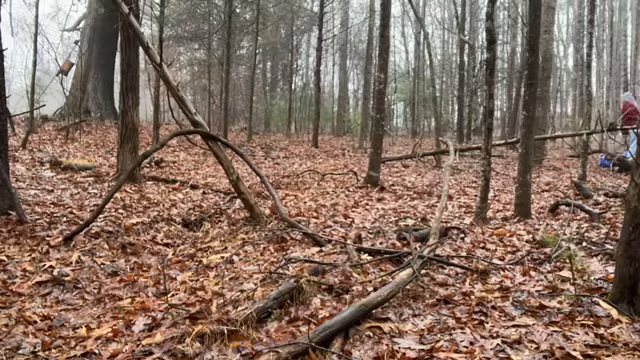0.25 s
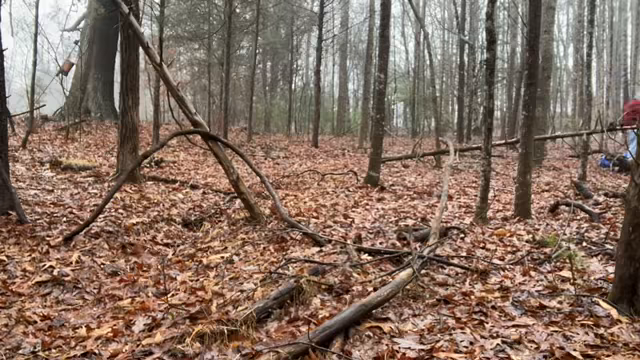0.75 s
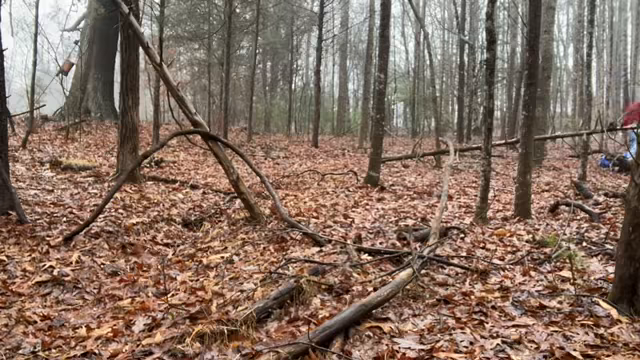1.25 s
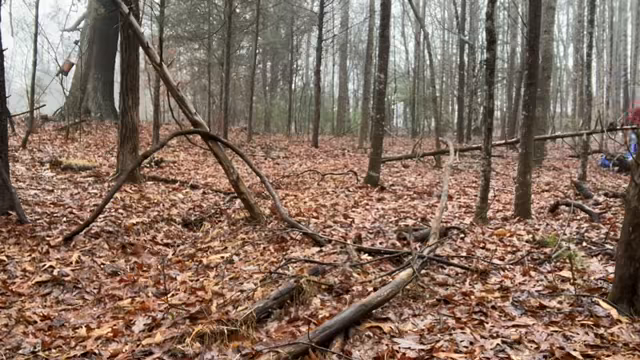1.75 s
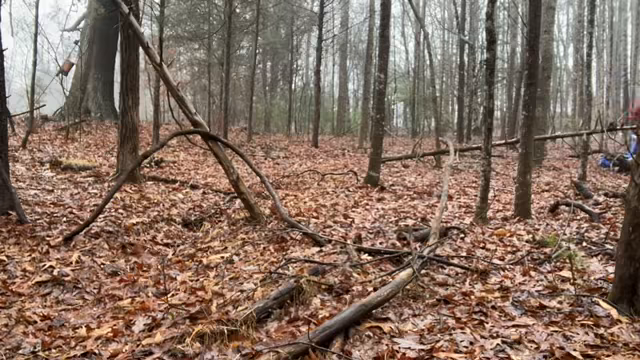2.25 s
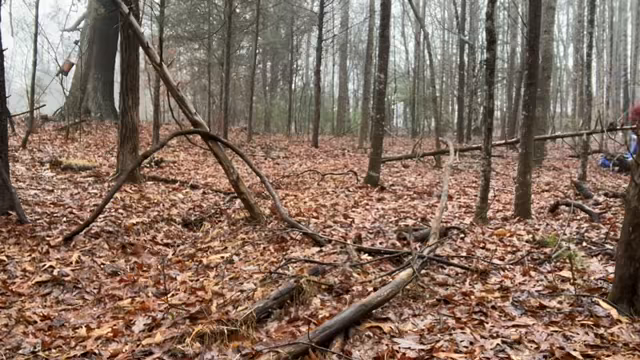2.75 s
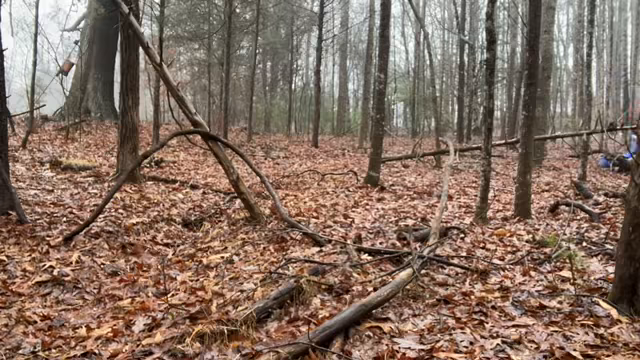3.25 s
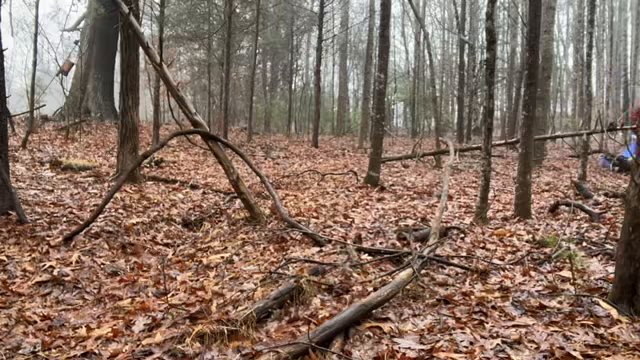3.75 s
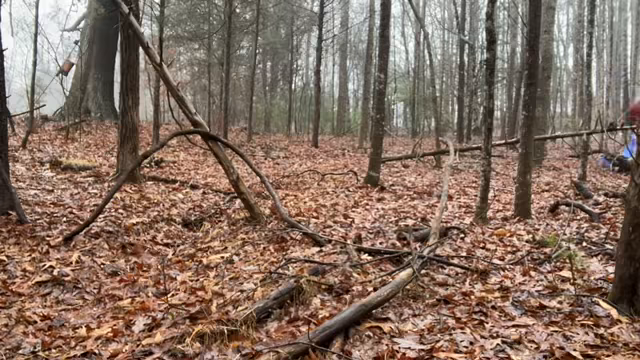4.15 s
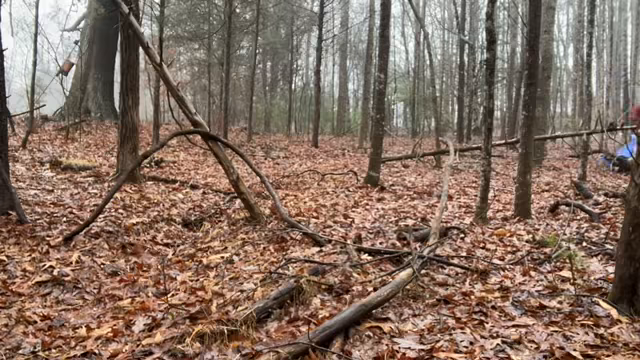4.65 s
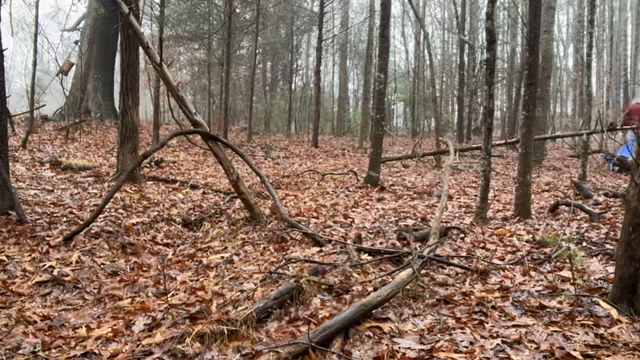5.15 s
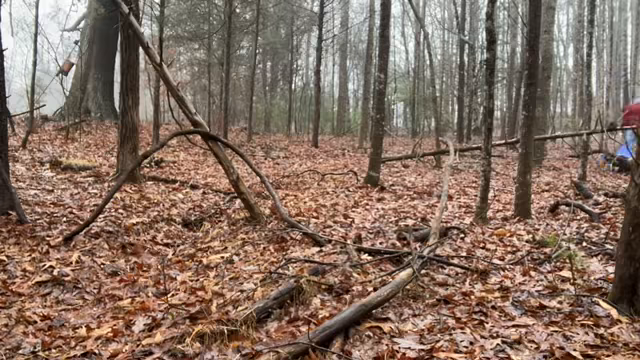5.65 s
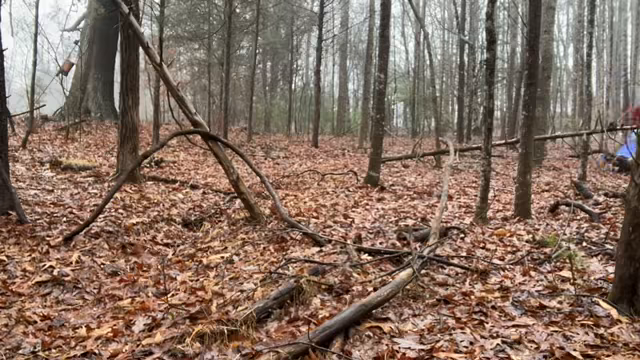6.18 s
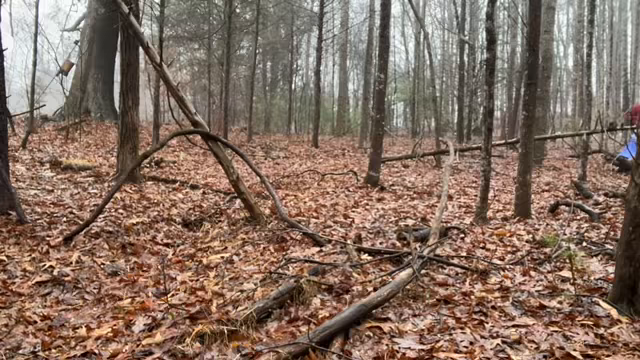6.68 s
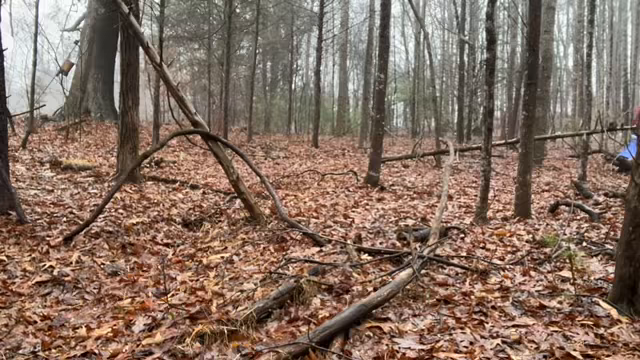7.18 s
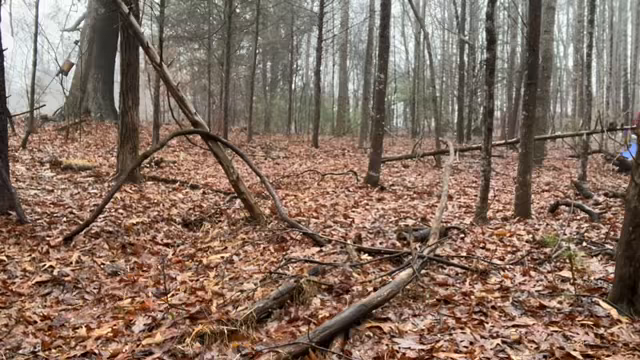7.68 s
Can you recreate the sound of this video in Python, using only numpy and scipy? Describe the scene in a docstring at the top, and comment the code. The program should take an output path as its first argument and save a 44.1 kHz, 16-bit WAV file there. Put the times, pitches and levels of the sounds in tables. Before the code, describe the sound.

Close, crisp raindrops tick and snap on leaf litter in stereo, backed by distant rain hiss and a faint low traffic-like rumble.

```python
"""A wood in steady rain, heard in stereo close to dry leaf litter.
Each drop flaps a leaf (a low pat), snaps its stiff blade (a crack) and bursts into spray: damped
resonators struck by a blow and a dying crackle of noise, then scattered by the litter and trunks.
Drips heavy to faint, narrow ticks, dull thuds and one struck stand join a fine patter.
Behind them lie far rain (filtered noise) and rumble like distant traffic (noise and wavering tones)."""
import sys
import numpy as np
from scipy import signal
from scipy.fft import rfft, irfft
from scipy.io import wavfile

SR = 44100
rng = np.random.default_rng(int(sys.argv[2]) if len(sys.argv) > 2 else 0)


def materialize(psi):
    """Save the field psi as 16-bit PCM at rate SR to the path in sys.argv[1].

    A 1-D psi becomes a single channel; in a 2-D psi each row is a channel.
    """
    bounded = np.clip(np.atleast_2d(psi).T, -1, 1)
    quanta = np.round(bounded * 32767).astype(np.int16)
    wavfile.write(sys.argv[1], SR, quanta)


N = 349272

TOP_HZ = 15800  # upper band limit of the pickup


def undb(db):
    """Level to amplitude: 20 dB is a factor of ten."""
    return 10 ** (np.asarray(db) / 20)


def unit(x):
    """Normalise the mean power: scale to rms 1."""
    return x / np.sqrt(np.mean(x ** 2))


def shape(hz, points):
    """Spectral envelope at hz: (frequency_hz, gain_db) points joined along log frequency."""
    f, db = np.transpose(points)
    return undb(np.interp(np.log(np.maximum(hz, 1)), np.log(f), db))


def colour(x, points):
    """Linear filtering: multiply the spectrum of x by an envelope, leaving phase alone."""
    hz = np.arange(N // 2 + 1) * SR / N
    return irfft(rfft(x) * shape(hz, points), N)


def curves(rows):
    """Slow modulation: linear interpolation of each column of a time table to every sample."""
    s, *columns = np.transpose(rows)
    return [np.interp(np.arange(N) / SR, s, c) for c in columns]


def walk(rate):
    """Random modulation: independent knots, rate per second, joined by lines and scaled to rms 1."""
    knots = rng.standard_normal(int(N / SR * rate) + 2)
    return unit(np.interp(np.arange(N) / SR * rate, np.arange(len(knots)), knots))


def resonance(hz, centre, q):
    """Damped harmonic oscillator: complex response with gain 1 at its centre."""
    damping = 1j * hz * centre / q
    return damping / (centre ** 2 - hz ** 2 + damping)


def swing(s, hz, db, decay_s):
    """Free damped vibration: a sine that starts at s and decays exponentially."""
    t = np.maximum(np.arange(N) / SR - s, 0)
    return -undb(db) * np.sin(2 * np.pi * hz * t) * np.exp(-t / decay_s)


def spread(mid, side):
    """Diffuse field: independent mid and side signals set the width of sound from all around."""
    # columns: frequency_hz, side_minus_mid_db
    width = [(60, -11), (110, -6.5), (200, -5), (380, -1), (700, 6), (1300, 4.5), (2400, -0.5), (4400, 0),
             (8100, -3), (13000, -3)]
    return mid + np.array([[1], [-1]]) * colour(side, width)


def scatter(x, litter_db, litter_s, trunks_db, trunks_s, size=16384):
    """Multiple scattering: noise tails for the near litter and the trunks, independent at each port."""
    t = np.arange(size) / SR
    tail = 0
    for db, decay_s in ((litter_db, litter_s), (trunks_db, trunks_s)):
        envelope = np.exp(-t / decay_s) - np.exp(-10 * t / decay_s)
        # unit energy, so db is the scattered energy relative to the direct sound
        tail = tail + undb(db) * unit(envelope * rng.standard_normal((2, size))) / np.sqrt(size)
    return x + signal.fftconvolve(x, tail, axes=1)[:, :N]


def impacts(rows, pat_q, crack_q, spray_hz, spray_q, spray_spread,
            crinkle, crinkle_s, fizz, fizz_s, size=512):
    """Impact excitation: drops strike leaf resonances; each part's dB is its energy over 1 ms."""
    s, pat_hz, pat_db, crack_hz, crack_db, spray_db, side = np.transpose(rows)[:, :, None]
    t, hz = np.arange(size) / SR, np.arange(size // 2 + 1) * SR / size
    ms, lead = 1e-3, 32  # one millisecond in s; room in samples for the earlier port
    port_lag_ms, port_shade_db = 0.542, 6  # far port against near one, for a drop fully to one side
    heavy_db = -12.5  # towards and above this a drop flattens the leaf in an ever cleaner smack
    bead = np.exp(spray_spread * rng.standard_normal((len(s), 1)))  # finer spray ticks higher

    def part(centre, q, db, grit, decay_s):
        """Source and resonator: a sharp blow and dying crackle of contacts excite one resonance."""
        crackle = rng.standard_normal((len(s), size)) * np.exp(-t / decay_s)
        crackle = crackle * np.sqrt(2 / (decay_s * SR))  # about unit energy
        ring = (1 + grit * rfft(crackle)) * resonance(hz, centre, q) ** 2
        return ring * undb(db) * np.sqrt(ms * SR / np.mean(abs(ring) ** 2, axis=1, keepdims=True))

    grit = crinkle / (1 + undb(np.maximum(pat_db, crack_db) - heavy_db))
    # the leaf dips as one piece while its blade snaps the other way
    pat = part(pat_hz, pat_q, pat_db, grit, crinkle_s)
    crack = -part(crack_hz, crack_q, crack_db, grit, crinkle_s)
    spray = part(spray_hz * bead, spray_q, spray_db, fizz, fizz_s)
    places = np.maximum((s * SR).astype(int) - lead + np.arange(size), 0).ravel()
    out = []
    for away in (side, -side):
        # the nearer port hears the drop louder and earlier
        delay_s = lead / SR + away * port_lag_ms * ms / 2
        port = undb(-away * port_shade_db / 2) * np.exp(-2j * np.pi * hz * delay_s)
        waves = irfft((pat + crack + spray) * port, size)
        out.append(np.bincount(places, waves.ravel(), N)[:N])
    return np.array(out)


def shower(count, near_db, reach, pat_hz, pat_db, pat_spread,
           crack_hz, crack_spread, spray_db, hardness_db):
    """Inverse-square law: drops fall evenly over ground out to reach listener heights, most of them faint."""
    when, area, bearing = rng.random((count, 3)).T
    # each drop leans toward a pat or toward spray; hardness_db sets how far and which way
    hard, small, stiff = np.clip(rng.standard_normal((count, 3)), -2, 2).T
    db = near_db - 10 * np.log10(1 + area * reach ** 2)
    top_db = -33  # light drops stay light
    levels = [db + pat_db - hardness_db * hard, db, db + spray_db + hardness_db * hard]
    pat, crack, spray = np.minimum(levels, top_db)
    return np.column_stack([when * N / SR, pat_hz * np.exp(pat_spread * small), pat,
                            crack_hz * np.exp(crack_spread * stiff), crack, spray,
                            np.cos(np.pi * bearing)])


def splash(rows, below_db=-10.0, limit_db=-35.0, flight_s=0.0068, leaf_spread=0.84, count=2):
    """Secondary impacts: droplets from each drip land nearby after exponential random flights."""
    s, pat_hz, pat_db, crack_hz, crack_db, spray_db, side = np.repeat(rows, count, axis=0).T
    flight, leaf = rng.random((len(s), 2)).T
    pitch = np.exp(leaf_spread * (2 * leaf - 1))
    loudest_db = np.max([pat_db, crack_db, spray_db], axis=0)
    drop_db = np.minimum(below_db, limit_db - loudest_db)  # droplets stay small
    return np.column_stack([s - flight_s * np.log(1 - flight), pat_hz * pitch, pat_db + drop_db,
                            crack_hz * pitch, crack_db + drop_db, spray_db + drop_db, side])


def far_traffic(pan_db=-2.5):
    """Noise and frequency modulation: lumpy low rumble, wavering engine drone and hum, a little right."""
    # rumble spectrum; columns: frequency_hz, relative_density_db (per Hz)
    rumble_spectrum = [(13, -57), (22, -29), (41, -8), (64, 2), (119, 1), (147, -4), (172, -8.5),
                       (209, -11), (242, -6.5), (260, -11), (340, -13), (570, -120)]
    # slow course of the rumble; columns: time_s, level_db
    rumble_level = [(0, -48.5), (4.1, -49), (5.9, -48.5), (6.8, -49), (7.92, -48)]
    # far engine through the trees, about which pitch and level waver; columns: time_s, pitch_hz, level_db
    engine = [(0, 107, -62), (1.1, 106.9, -52.5), (2.1, 109.6, -65), (3.5, 106.1, -63.5), (5.0, 124, -56.5),
              (5.6, 143.3, -51.5), (6.5, 143, -54.5), (7.92, 137.8, -78)]
    hum_hz, hum_db = 237.8, -66
    lumps_db = 2.3  # rms unevenness of the rumble
    (level_db,), (hz, drone_db) = curves(rumble_level), curves(engine)
    noise = unit(colour(rng.standard_normal((2, N)), rumble_spectrum))
    rumble = spread(*noise) * undb(level_db + lumps_db * walk(13))
    for pitch, db in ((hz, drone_db), (np.full(N, hum_hz), hum_db)):
        phase = 2 * np.pi * np.cumsum(pitch * (1 + 0.0096 * walk(12))) / SR
        # moving air makes the tones fade in and out
        rumble = rumble + np.sqrt(2) * np.sin(phase) * undb(db + 2 * walk(9.4))
    return rumble * undb(np.array([[pan_db], [-pan_db]]) / 2)


def far_rain(flicker_db=2.04, count=9):
    """Incoherent summation: countless far drops merge into noise whose octave bands flicker separately."""
    # wash spectrum; columns: frequency_hz, relative_density_db (per Hz)
    wash_spectrum = [(100, -25), (180, -.5), (300, -2.5), (450, -2), (750, .5), (1150, -3), (1500, -4),
                     (2000, -2.7), (2500, -3), (4200, -6), (5800, -7), (8200, -9), (9500, -11),
                     (11900, -13.5), (13800, -14), (15200, -36)]
    wash_db = -47.8  # mean level, before the flicker and slow swell
    hz = np.arange(N // 2 + 1) * SR / N
    octave = np.clip(np.log2(np.maximum(hz, 1) / TOP_HZ) + count - 1, 0, count - 1)
    noise = rfft(unit(colour(rng.standard_normal((2, N)), wash_spectrum)))
    wash = 0
    for k in range(count):
        band = irfft(noise * (np.round(octave) == k), N)
        wash = wash + band * undb(flicker_db * walk(70))
    swell_db = .4 * walk(5)
    return spread(*wash) * undb(wash_db + swell_db)


def thuds():
    """Damped modes: knocks through ground or stand ring at two pitches, then a lower boom follows."""
    # levels are starting amplitudes before the bass cut; left_share is left swing over right
    # columns: start_s, knock_hz, knock_db, boom_db, left_share
    blows = [(1.684, 190, -31.5, -35, 0.43), (1.82, 175, -36, -37, 0.39), (2.922, 184, -33, -31, 0.53),
             (3.199, 177, -21.5, -18, -0.37)]
    knock_decay_s = 0.017
    tock_hz, tock_decay_s = 255, 0.0071  # the higher ring of every knock
    boom_hz, boom_decay_s, boom_late_s = 69.6, 0.011, 0.0059
    out = 0
    for s, hz, knock_db, boom_db, left in blows:
        knock = swing(s, hz, knock_db, knock_decay_s)
        knock = knock + swing(s, tock_hz, knock_db, tock_decay_s)
        boom = swing(s + boom_late_s, boom_hz, boom_db, boom_decay_s)
        # a negative share: the stand rocks and the ports move against each other
        out = out + np.array([[left], [1]]) * knock + boom
    # the ground radiates no deep bass
    return signal.sosfilt(signal.butter(2, 40, "high", fs=SR, output="sos"), out)


def stand():
    """Modal superposition: a drip strikes the stand, one mode of which rocks the ports in opposition."""
    # modes of the stand, left_share being left swing over right
    # columns: pitch_hz, level_db, decay_s, left_share
    modes = [(470, -28, 0.0025, 0.34), (750, -11, 0.0043, -1.06), (760, -22.5, 0.006, 0.69),
             (1020, -20.5, 0.0043, 0.47)]
    strike_s = 3.1997
    return sum(np.array([[left], [1]]) * swing(strike_s, hz, db, decay_s)
               for hz, db, decay_s, left in modes)


def patter():
    """Random superposition: thousands of fine drops tick on the litter all around."""
    rows = shower(count=4500, near_db=-37.0, reach=7, pat_hz=900, pat_db=-2.0, pat_spread=0.46,
                  crack_hz=3200, crack_spread=0.56, spray_db=-5.5, hardness_db=3.0)
    hits = impacts(rows, pat_q=0.97, crack_q=1.3, spray_hz=8040, spray_q=1.2, spray_spread=0.25,
                   crinkle=1.0, crinkle_s=.002, fizz=.83, fizz_s=.00086)
    return scatter(hits, litter_db=-2.0, litter_s=.003, trunks_db=-14, trunks_s=0.034)


def ticks(count=320, near_db=-36.5, reach=3.3, centre_hz=2400, pitch_spread=0.565):
    """Narrow resonance: brief ticks each ring at their own pitch, some close and many fainter around."""
    # close narrow ticks: ringing leaves, and bright bursts of fine spray near 12-13 kHz
    # columns: start_s, pitch_hz, level_db, side (-1 left to 1 right)
    close = [(0.0246, 12800, -30, 0.0), (0.087, 2900, -38, -0.5), (0.3685, 2880, -31, -0.4),
             (0.507, 3300, -32.5, -0.55), (0.827, 2080, -35, -0.14), (0.9186, 1020, -27.5, -0.36),
             (0.959, 5100, -29, -0.1), (1.937, 4340, -32, -0.36), (2.0057, 3190, -14, 0.0),
             (2.1165, 12800, -34, 0.1), (2.4635, 3960, -35, 0.5), (3.2012, 3470, -24.5, 0.054),
             (3.333, 2500, -28, -0.37), (3.7612, 2420, -37, -0.19), (3.95, 3680, -31, 0.62),
             (4.2161, 2600, -20, 0.41), (4.2163, 12700, -26, 0.116), (4.2165, 4650, -17, 0.45),
             (4.2228, 4230, -22, 0.24), (4.319, 4400, -29, -0.26), (4.332, 4200, -31.5, -0.0048),
             (4.3409, 12200, -27, 0.0), (5.3282, 4370, -28.5, 0.35), (5.4654, 12800, -34, 0.0),
             (5.551, 1140, -36, 0.1), (5.703, 2730, -37, -0.66), (6.017, 2283, -33, 0.1),
             (6.4022, 2210, -23, -0.4), (6.4026, 12500, -28, -0.15), (6.4335, 1950, -15, -0.3),
             (7.747, 4730, -29, 0.46)]
    when, area, bearing = rng.random((count, 3)).T
    pitch = centre_hz * np.exp(pitch_spread * np.clip(rng.standard_normal(count), -1.8, 1.5))
    distant_db = near_db - 10 * np.log10(1 + area * reach ** 2)
    around = np.column_stack([when * N / SR, pitch, distant_db, np.cos(np.pi * bearing)])
    s, hz, db, side = np.vstack([close, around]).T
    pat_share, pat_db, spray_db = .35, -11, -12  # pat pitch and part levels relative to the ring
    rows = np.column_stack([s, hz * pat_share, db + pat_db, hz, db, db + spray_db, side])
    hits = impacts(rows, pat_q=1.0, crack_q=3.6, spray_hz=7800, spray_q=0.99, spray_spread=0.19,
                   crinkle=0.43, crinkle_s=0.0019, fizz=0.63, fizz_s=.0009)
    return scatter(hits, litter_db=-11, litter_s=.0025, trunks_db=-20, trunks_s=.04)


def drips():
    """Impact radiation: drops off the branches strike close leaves, and more fall at random among them."""
    # listed drips, heavy to faint, levels relative to the drip layer's gain
    # columns: start_s, pat_hz, pat_db, crack_hz, crack_db, spray_db, side (-1 left to 1 right)
    listed = [(0.0245, 990, -34, 2600, -31, -20, -0.1), (0.0351, 885, -32, 4000, -39, -44, 0.55),
              (0.0853, 735, -28, 4520, -22, -35, -0.69), (0.359, 716, -27.5, 3300, -29, -45, 0.51),
              (0.3659, 890, -27, 2970, -24.5, -28, -0.6), (0.7598, 910, -38, 4200, -45, -33, -0.1),
              (0.8145, 840, -27, 3900, -30, -46, -0.38), (0.8787, 900, -24, 2200, -46, -31.5, -0.39),
              (0.9419, 600, -39, 2400, -33, -28, 0.53), (0.9508, 850, -26, 2400, -36, -32, -0.079),
              (1.069, 770, -29, 4600, -41, -13.5, 0.86), (1.1108, 650, -45, 1680, -24, -21, 0.32),
              (1.1599, 650, -36, 1900, -26, -19.5, -0.36), (1.279, 1000, -26.5, 3500, -35, -32.5, 0.48),
              (1.3179, 1090, -23, 2900, -35, -29, -0.32), (1.335, 1000, -30, 4440, -28, -27, -0.66),
              (1.3515, 740, -35, 5200, -32, -32, 0.0029), (1.569, 1030, -28.5, 2600, -32, -30.5, -0.8),
              (1.5926, 600, -35, 2600, -37, -35, 0.0), (1.662, 650, -31, 4800, -28.5, -41, 0.64),
              (1.705, 850, -38, 2800, -28, -25, -0.75), (1.8878, 715, -36, 2800, -50, -47, -0.46),
              (2.0047, 740, -12.8, 2440, -8.5, -12.5, 0.05), (2.0397, 950, -48, 3500, -35, -36, -0.1),
              (2.0754, 730, -45, 4600, -31, -38, 0.2), (2.088, 1250, -27.5, 3700, -32, -36, -0.44),
              (2.2393, 894, -34, 5200, -30, -44, -0.2), (2.251, 1450, -27, 4500, -37, -31, -0.26),
              (2.2762, 680, -39, 4200, -43, -50, 0.59), (2.3082, 930, -38, 5000, -29, -41, 0.55),
              (2.3271, 830, -21.5, 4530, -23, -36, -0.76), (2.349, 1026, -25, 2920, -33, -30, -0.36),
              (2.3943, 930, -36, 4700, -24, -36, 0.206), (2.4337, 1460, -32, 4200, -33, -28, 0.4),
              (2.461, 900, -18, 3200, -27, -20, 0.33), (2.4922, 650, -35, 1800, -28, -20.5, 0.55),
              (2.531, 1100, -30, 3400, -29.5, -36, -0.25), (2.6247, 602, -30.5, 3900, -47, -50, 0.77),
              (2.7853, 638, -40, 2530, -27, -22.5, -0.75), (2.8079, 900, -20.5, 4620, -28, -39, -0.72),
              (2.8666, 770, -38, 1600, -33, -27.5, 0.3), (2.8824, 620, -39, 2600, -26.5, -33, 0.2),
              (3.0055, 1500, -42, 5200, -29, -30, 0.2), (3.03, 1100, -29, 3200, -37, -25, 0.28),
              (3.095, 1490, -28.5, 3950, -27, -32, -0.21), (3.1178, 980, -38, 2820, -30, -43, 0.0),
              (3.1984, 900, -16.5, 2400, -18, -23, 0.087), (3.261, 646, -42, 4200, -29, -29, 0.78),
              (3.2952, 640, -29.5, 1970, -24, -43, -0.084), (3.3518, 650, -32, 3300, -30, -38, 0.2),
              (3.3829, 650, -30, 2600, -30, -18.5, 0.52), (3.3962, 870, -13.5, 2900, -20, -15, -0.2),
              (3.4518, 850, -29, 3600, -34, -37, 0.44), (3.5473, 900, -22.5, 4600, -35, -27, 0.0),
              (3.5519, 1140, -36, 4600, -31, -29, 0.1), (3.5719, 704, -26.5, 2560, -25.5, -21, -0.32),
              (3.6946, 900, -30.5, 4300, -29, -25, 0.2), (3.7609, 850, -28.5, 2370, -20, -36, 0.0),
              (3.7808, 1470, -28, 4000, -34, -50, 0.29), (3.869, 950, -30.5, 2600, -28, -52, 0.23),
              (3.927, 1250, -26.5, 2200, -40, -50, -0.35), (3.9689, 1070, -44, 4500, -35, -28, 0.37),
              (3.9866, 1170, -26, 4600, -32, -33, -0.23), (4.1622, 600, -31, 3000, -50, -50, 0.68),
              (4.2159, 880, -20.5, 4570, -12.5, -19.5, 0.348), (4.2567, 816, -24.5, 4600, -45, -53, 0.017),
              (4.3407, 643, -33, 4650, -23, -24, -0.21), (4.4815, 930, -41, 5200, -31, -30, 0.1),
              (4.6274, 796, -27, 2200, -37, -50, -0.76), (4.6527, 1210, -25.5, 4600, -42, -47, -0.16),
              (4.8018, 864, -38, 2200, -40, -43, -0.6), (4.8563, 1020, -23.5, 4640, -23, -33, 0.0),
              (4.95, 1000, -29, 4620, -27, -40, -0.31), (4.9942, 810, -31, 3540, -26.5, -31, -0.81),
              (5.048, 900, -31, 5030, -24, -41, 0.59), (5.07, 1500, -25.5, 4600, -27, -31, 0.26),
              (5.2178, 760, -32.5, 3600, -50, -50, 0.22), (5.2601, 696, -36, 4400, -26.5, -32, -0.2),
              (5.3278, 1060, -25, 4160, -33, -58, 0.4), (5.379, 786, -31, 1910, -30, -57, 0.13),
              (5.4652, 600, -48, 2900, -49, -36, 0.0), (5.479, 900, -37, 2926, -30, -48, 0.0),
              (5.7028, 600, -42, 2720, -37, -28, -0.1), (5.8992, 620, -32.5, 3200, -34, -37, -0.13),
              (5.9708, 850, -26.5, 2570, -22, -32, 0.34), (6.1568, 644, -37, 2120, -23, -49, 0.15),
              (6.1671, 644, -38, 1810, -26, -39, 0.34), (6.1869, 600, -43, 1620, -39, -45, 0.14),
              (6.202, 890, -35, 2100, -33, -50, -0.77), (6.3351, 960, -39, 4400, -30.5, -25, 0.087),
              (6.402, 790, -23.5, 2500, -24, -22, -0.39), (6.4333, 950, -16, 1690, -12, -26, -0.3),
              (6.506, 1090, -39, 5000, -30.5, -40, -0.078), (6.7206, 1020, -43, 5100, -40, -35, 0.1),
              (6.8295, 756, -21, 3040, -33, -23, -0.55), (6.8365, 760, -25.5, 3400, -33, -24, -0.37),
              (6.8844, 750, -31.5, 3320, -28, -19.5, 0.33), (6.8973, 1220, -23, 4670, -29, -26, -0.29),
              (6.9176, 595, -39, 1800, -29.5, -44, 0.1), (7.011, 701, -34.5, 4200, -30, -27.5, 0.52),
              (7.196, 750, -28.5, 2900, -33, -33, 0.96), (7.341, 830, -38, 4400, -37, -47, 0.32),
              (7.4142, 994, -27.5, 4080, -36, -33, 0.0), (7.4279, 640, -28.5, 5200, -31, -49, 0.79),
              (7.4427, 600, -43, 5200, -29, -37, 0.2), (7.512, 950, -26.5, 2700, -37, -46, 0.52),
              (7.5373, 690, -27.5, 2500, -20, -43, 0.24), (7.559, 1100, -27.5, 4600, -27.5, -51, 0.31),
              (7.6466, 1500, -43, 4100, -32, -34, 0.2), (7.8225, 1000, -22, 4530, -28, -25.5, -0.43)]
    random_drips = shower(count=26, near_db=-34.0, reach=1.5, pat_hz=950, pat_db=-4.0, pat_spread=0.35,
                          crack_hz=2500, crack_spread=1.0, spray_db=2.5, hardness_db=-1.5)
    rows = np.vstack([listed, random_drips])
    rows = np.vstack([rows, splash(rows)])
    hits = impacts(rows, pat_q=0.83, crack_q=1.09, spray_hz=8600, spray_q=1.3, spray_spread=0.26,
                   crinkle=.9, crinkle_s=0.0029, fizz=1.9, fizz_s=.0009)
    gain_db = -1.7
    return undb(gain_db) * scatter(hits, litter_db=-11.5, litter_s=0.0025,
                                   trunks_db=-16.5, trunks_s=0.095)


def scene():
    """Linear superposition: close drops, coloured by the housing, over the far sounds and knocks."""
    # how the housing colours close drops; columns: frequency_hz, gain_db
    housing = [(100, -2), (400, 2), (700, 0), (1400, -.5), (2800, .5), (4400, 1), (5800, -5.5), (8100, 1),
               (10400, -1), (12800, -0.5), (14500, -3.5), (16000, -18)]
    close = colour(drips() + ticks() + patter(), housing)
    return close + far_rain() + far_traffic() + thuds() + stand()


def ports(x):
    """Mid-side filtering: spaced ports hear the treble in and out of step by turns along frequency."""
    # columns: frequency_hz, mid_db, side_db
    port_response = [(4200, 0, 0), (5500, -0.5, 2), (7000, 0, -1), (8100, 1.5, -9), (9300, 0, 1),
                     (9700, -3, 3), (10400, -18, 4), (11200, -9, 4), (12000, 0.5, -4), (13000, 1.5, -7),
                     (14500, 0, -3)]
    hz, mid_db, side_db = np.transpose(port_response)
    mid = colour((x[0] + x[1]) / 2, np.column_stack([hz, mid_db]))
    side = colour((x[0] - x[1]) / 2, np.column_stack([hz, side_db]))
    return np.array([mid + side, mid - side])


def record(dry):
    """Saturation and band limiting: the ports' signal clips at full scale, then loses its top."""
    low_pass = signal.ellip(10, .2, 90, TOP_HZ, fs=SR, output="sos")
    return signal.sosfilt(low_pass, np.clip(ports(dry), -1, 1))


dry = scene()
out = record(dry)
materialize(out)
```